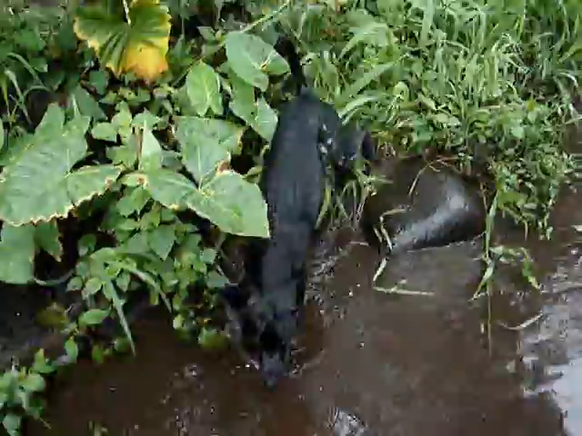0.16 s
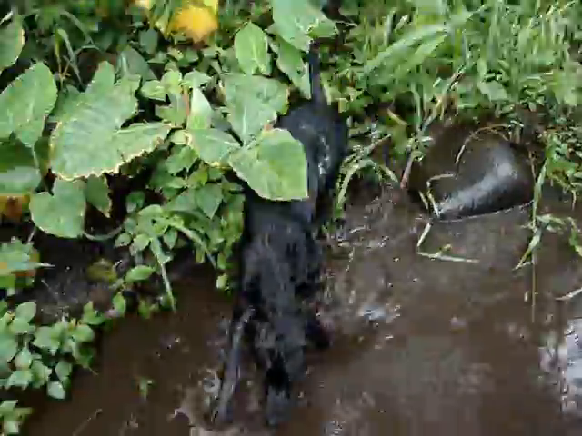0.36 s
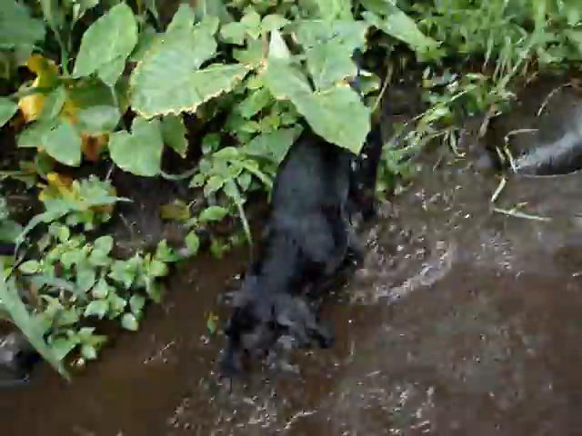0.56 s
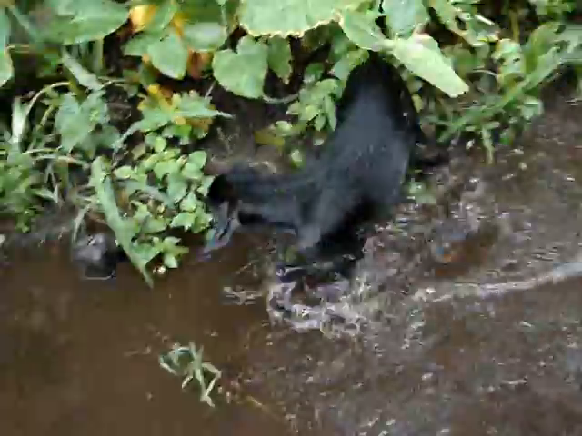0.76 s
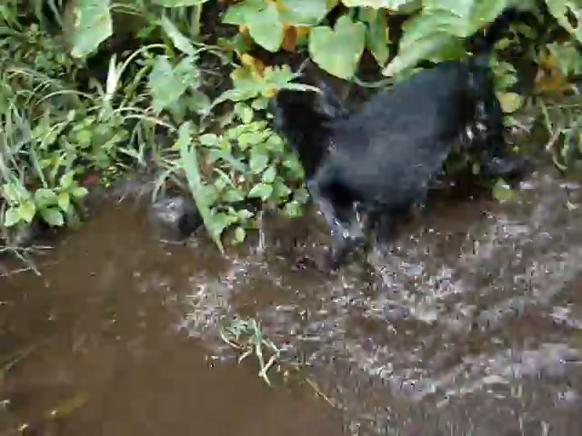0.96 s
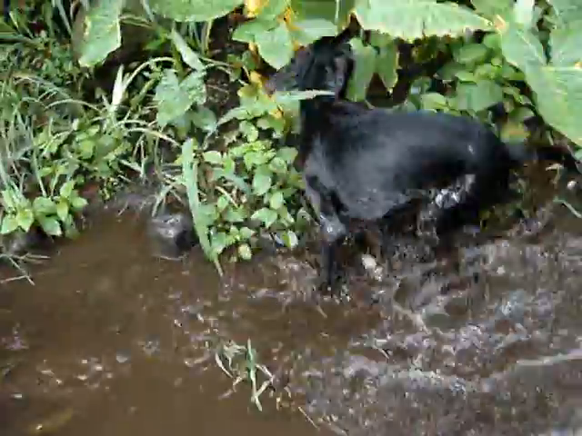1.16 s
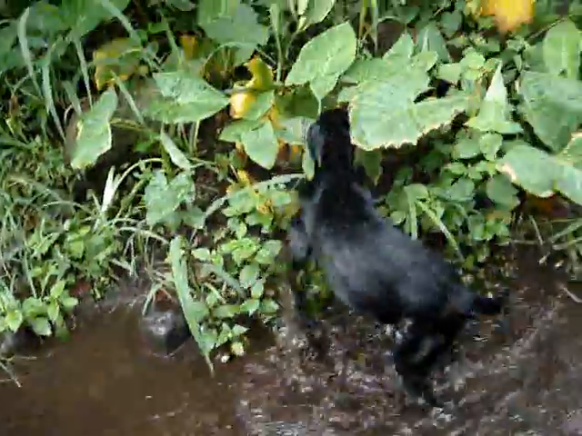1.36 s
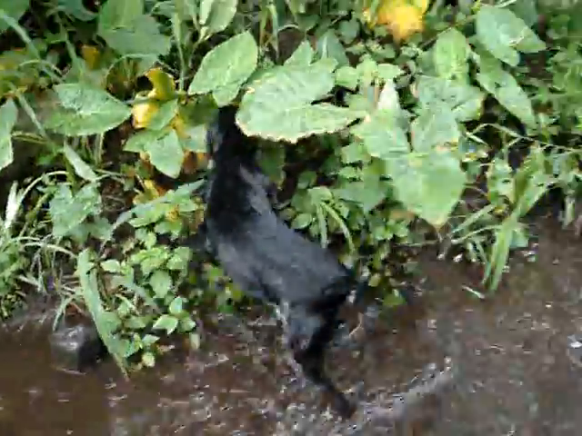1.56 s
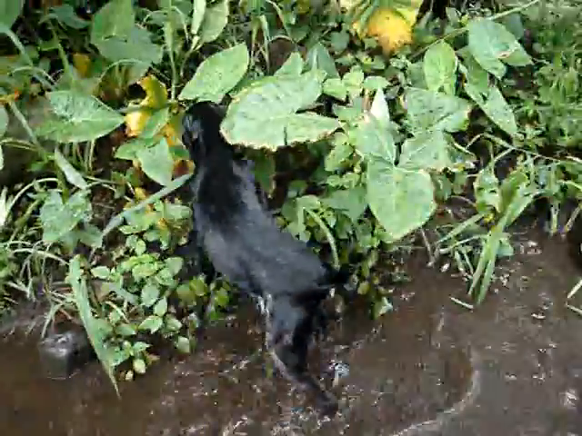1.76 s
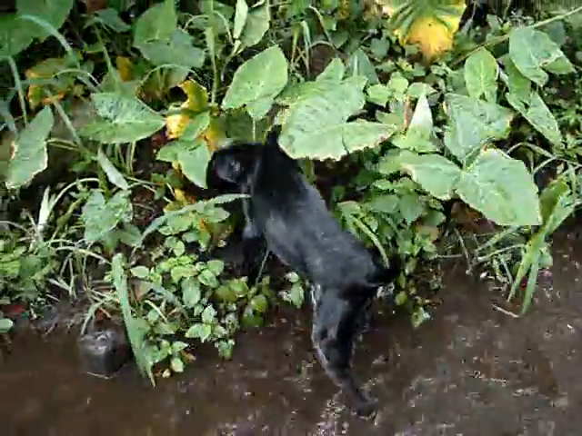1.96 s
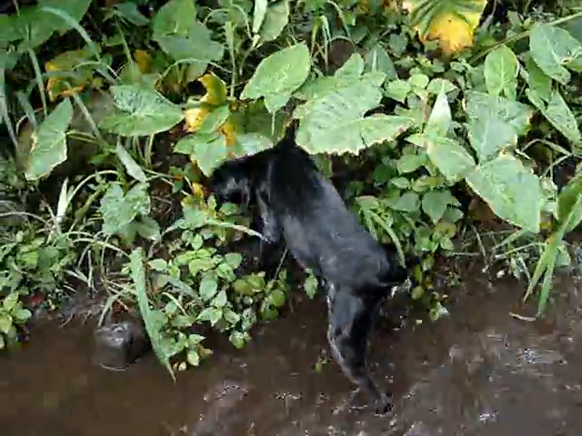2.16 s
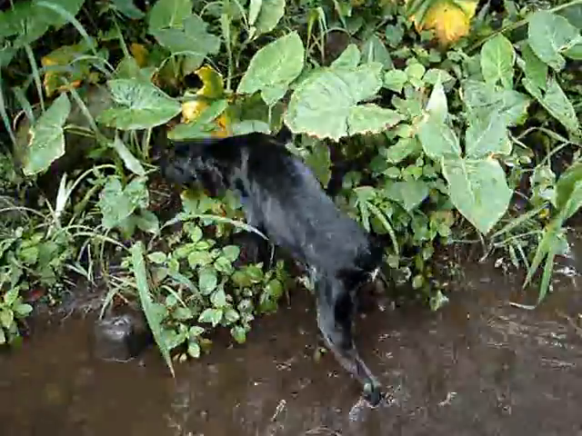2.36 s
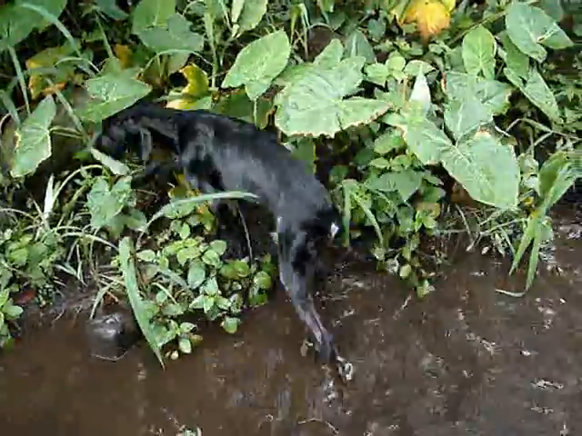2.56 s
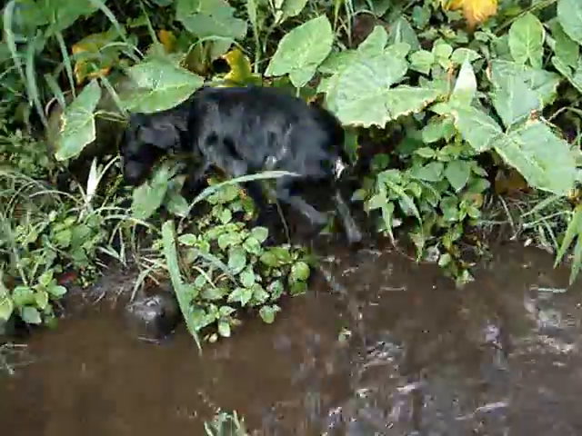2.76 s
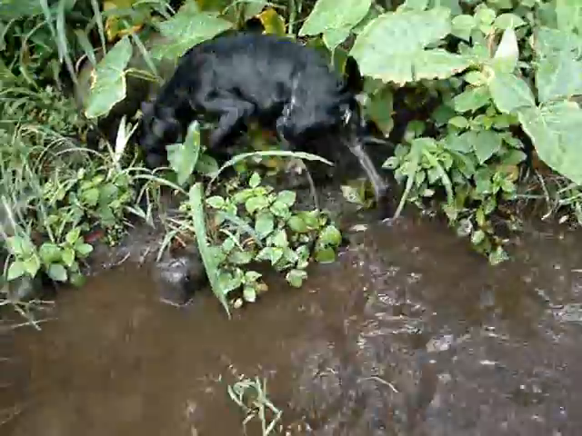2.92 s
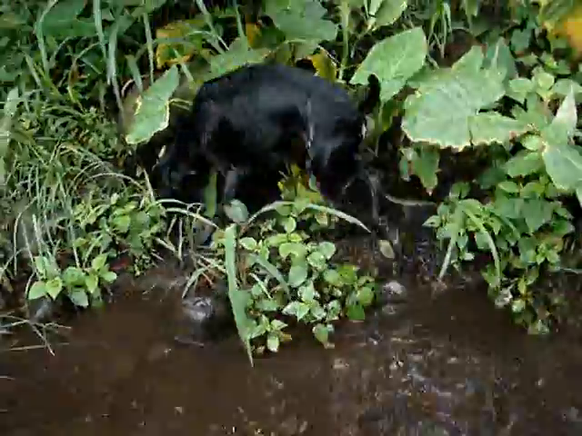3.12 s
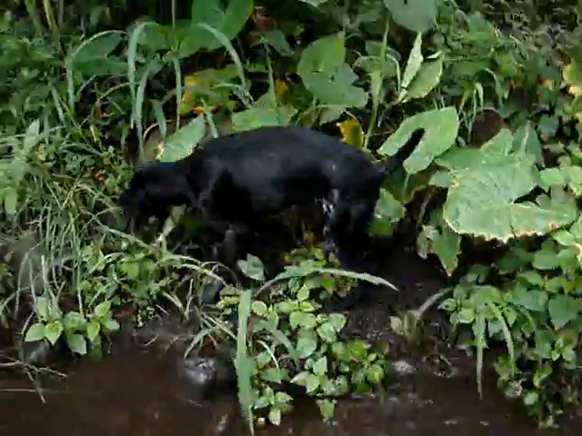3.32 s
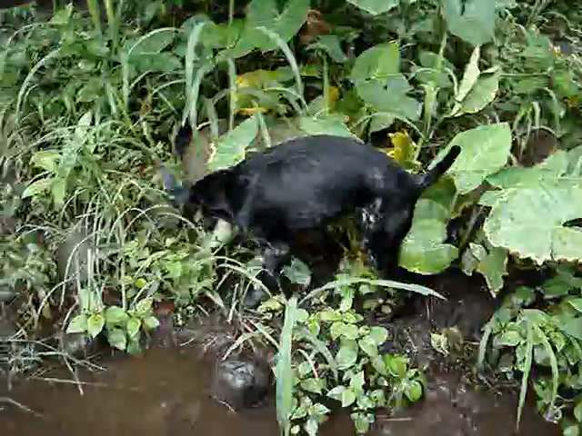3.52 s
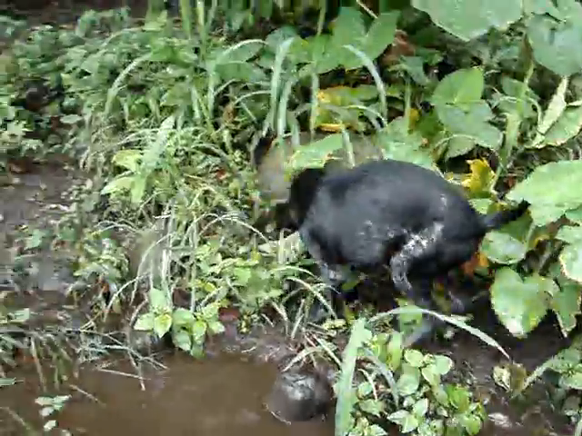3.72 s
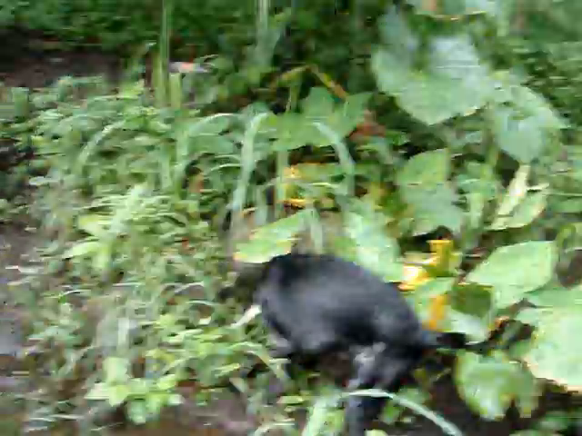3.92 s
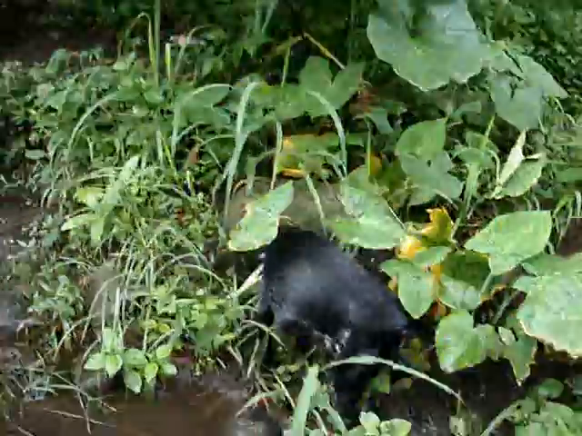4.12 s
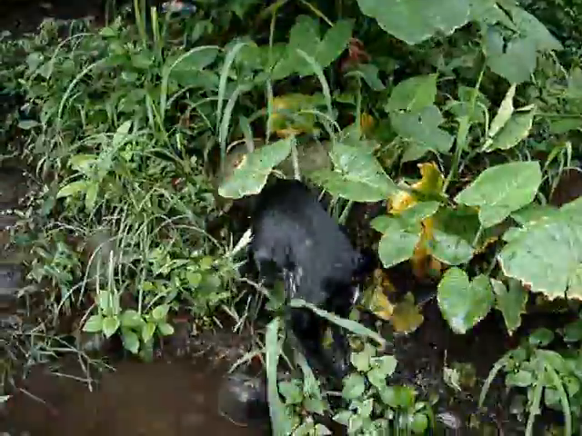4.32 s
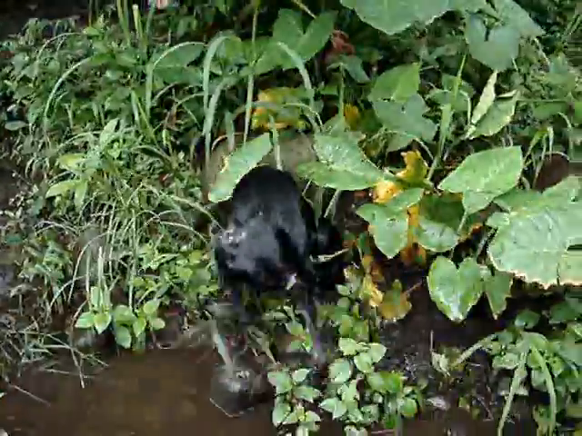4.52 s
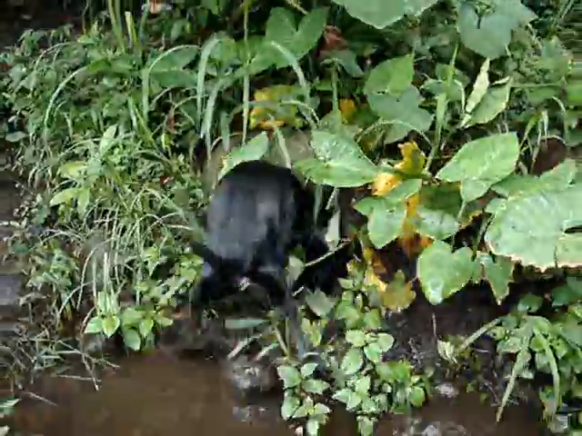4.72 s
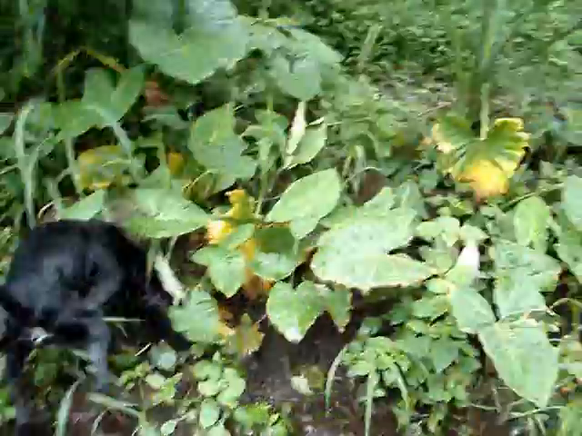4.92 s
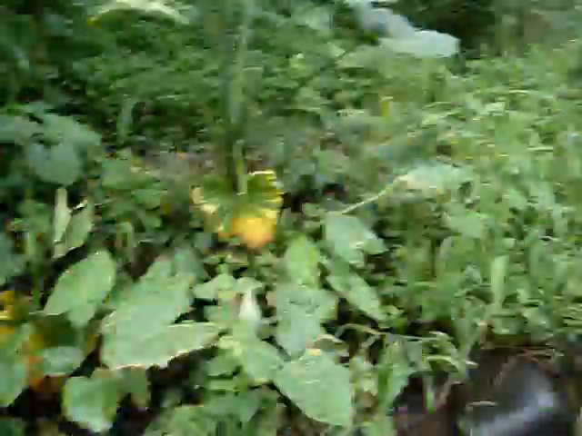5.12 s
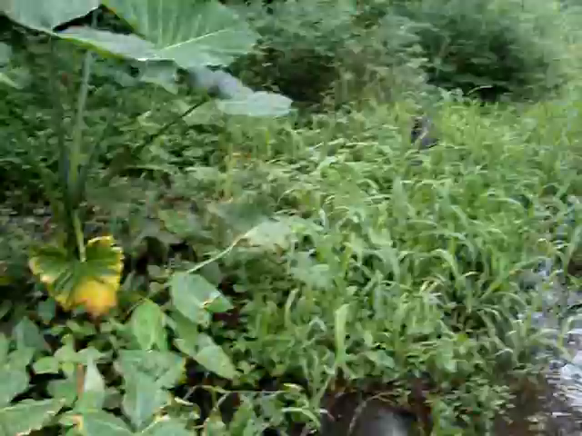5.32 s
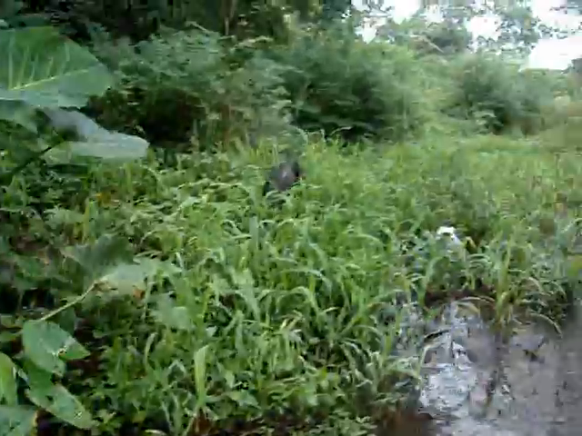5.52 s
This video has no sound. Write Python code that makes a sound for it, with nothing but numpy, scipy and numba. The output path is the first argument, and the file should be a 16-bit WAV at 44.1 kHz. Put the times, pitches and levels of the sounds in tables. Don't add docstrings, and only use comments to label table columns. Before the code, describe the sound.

Paws plop and splash in shallow running water, peaking in one big slap, followed by steady trickling, a few smaller splashes and drips.

```python
import sys
import numpy as np
from scipy import signal
from scipy.fft import rfft, irfft, next_fast_len
from scipy.io import wavfile
from scipy.ndimage import uniform_filter1d
from numba import njit

SR = 44100
rng = np.random.default_rng(int(sys.argv[2]) if len(sys.argv) > 2 else 0)


def store_wav(level_fs):
    pcm = np.round(np.clip(np.atleast_2d(level_fs), -1, 1) * 32767)
    wavfile.write(sys.argv[1], SR, pcm.T.astype(np.int16))


def gain_from_db(level_db):
    decades = np.asarray(level_db, float) / 20
    return 10 ** decades


N = 250399

# start in seconds, droplet level in dB, centre pitch in Hz,
# high spray in dB against the droplets, length in ms.
SHEETS = [(0.325, -19, 3700, -13, 16), (0.343, -16, 3040, -25, 24), (0.541, -20, 3550, -4.5, 32),
          (0.578, -14.5, 4240, -24, 11.3), (0.682, -20, 3120, -10, 14), (0.786, -17.5, 2500, -10, 15.5),
          (.975, -17, 4400, -17, 13), (1.116, -19.5, 3500, -19, 36), (1.166, -16.5, 3170, -16, 15),
          (1.231, -20, 2400, -20, 9.2), (1.274, -12.5, 2620, -12, 15.5), (1.33, -24, 3580, -16, 30),
          (1.37, -28, 3300, -14, 13), (1.405, -24, 1540, -23, 43), (1.426, -30, 3600, -15, 28),
          (1.452, -19.5, 3770, -11, 44), (1.505, -26, 3800, -7, 10), (1.625, -24, 2980, -12, 13),
          (2.519, -20, 2960, -14, 7.9), (2.72, -25, 2700, -19, 22), (3.012, -21, 1310, -12, 24),
          (3.078, -31, 2940, 1.5, 9.9), (3.194, -17, 2070, -13, 23), (3.263, -21, 3220, -20, 25),
          (3.451, -33, 1970, -18, 15), (4.021, -19.5, 3250, -16, 26)]
# start in seconds, peak in dB, pitch in Hz, ringing in cycles.
POCKETS = [(0.21, 0, 1610, 14), (0.325, -2.5, 550, 20), (0.351, 1, 1040, 13), (0.54, 3.5, 885, 12),
           (0.564, 4, 980, 4.6), (0.714, -15, 1500, 13), (0.748, -6, 1650, 7.6), (0.762, 0.5, 680, 8.5),
           (0.783, -2, 1660, 15), (0.811, -14, 1260, 12), (0.995, 6, 1080, 6.3), (1.114, -6, 1030, 10),
           (1.134, 9, 1550, 5), (1.1664, 5, 1010, 13.6), (1.031, -5, 714, 9), (1.276, 13.5, 960, 3.2),
           (1.372, -6, 1020, 13), (1.463, -3, 417, 8.2), (1.495, -8, 1520, 11), (2.727, 0.5, 1590, 12),
           (3.012, -3.5, 1600, 27), (3.07, -8, 1080, 18), (3.153, -4, 925, 18), (3.215, 3, 1440, 14),
           (3.2408, 0.5, 1630, 11), (3.337, 1, 790, 7), (3.372, -10, 595, 9), (3.43, -5, 447, 22),
           (4.419, 1, 640, 5), (5.196, -3, 630, 8.3)]
# start in seconds,
# peak in dB, pitch in Hz.
SINGLE_DROPS = [(0.3267, -14, 3920), (0.3452, -7, 3500), (0.5472, -15, 3540), (0.5827, -11, 4000),
                (0.5867, -14, 4100), (0.8248, -5, 3250), (0.8324, -19, 3120), (0.8912, -12.5, 2530),
                (0.9433, -15, 3615), (0.9813, -12, 4560), (0.9975, -5, 2780), (1.0193, -13, 4500),
                (1.1218, -16, 3280), (1.1349, -16, 3615), (1.1568, -17, 3300), (1.1733, -13, 4040),
                (1.1776, -13, 2720), (1.2053, -4, 2060), (1.2057, -2, 3300), (1.4417, -26, 1940),
                (1.2322, -4, 2340), (1.2787, -10, 4600), (1.3474, -10, 3760), (1.3759, -14, 4688),
                (1.4552, -7, 4230), (1.4647, -4.5, 3830), (1.4751, -7, 3700), (1.4786, -7, 3615),
                (1.532, -12, 3530), (1.6293, -15, 3920),
                (2.1448, -17, 2070), (2.4648, -20, 1720), (2.465, -26, 4600), (2.5206, -20.5, 4850),
              (2.5664, -25, 6300), (2.7218, -20, 3840), (2.7283, -17, 1940), (2.7381, -17.5, 3140),
              (2.9849, -15, 6750), (3.013, -14, 2090), (3.0285, -30, 6900), (3.1963, -18, 2090),
              (3.2008, -15.5, 4630), (3.2665, -17.5, 3450), (3.3726, -17, 1650), (3.0188, -26, 424),
              (3.3745, -19.5, 406), (4.0204, -21, 2020), (4.0405, -20, 2400), (4.0422, -19, 3440),
              (4.9178, -15, 3890), (2.7225, -22, 4600), (3.0819, -23, 3600), (5.2662, -15.5, 6060)]
# start in seconds,
# level in dB, pitch in Hz.
SPRAY_DROPLETS = [(0.3258, -36, 5700), (0.3304, -24, 2800), (0.3327, -27, 4260), (0.3353, -32, 5700),
                  (0.355, -23, 3360), (0.3552, -32, 4820), (0.3586, -26, 4670), (0.3608, -24, 2740),
                  (0.4136, -27, 5510), (0.5423, -25, 2650), (0.5429, -33, 6640), (0.5433, -33, 5000),
                  (0.5574, -28, 6580), (0.5605, -27, 3380), (0.5606, -24, 4040), (0.5807, -20, 5510),
                  (0.5872, -32, 5580), (0.5875, -23, 3550), (0.6184, -23, 3480), (0.6858, -21, 3630),
                  (0.6866, -28, 6830), (0.6889, -26, 4570), (0.6896, -28, 6950), (0.6921, -19, 2900),
                  (0.7058, -37, 4200), (0.7888, -31, 7000), (0.7938, -26, 5570), (0.7978, -30, 6700),
                  (0.8003, -23, 2820), (0.825, -17, 2640), (0.8262, -21, 3530), (0.937, -22, 2840),
                  (0.9554, -21, 2570), (0.9738, -18, 4760), (0.9834, -27, 6640), (0.9837, -19, 4300),
                  (0.9854, -25, 6330), (0.9888, -27, 5450), (0.9985, -18.5, 4000), (1.0095, -28, 3400),
                  (1.0194, -20, 3130), (1.0307, -24, 2760), (1.0398, -25, 2880), (1.049, -22, 4200),
                  (1.1378, -23, 4070), (1.1425, -21, 4510), (1.147, -28, 3760), (1.1565, -34, 6700),
                  (1.166, -21, 3030), (1.1778, -29, 5070), (1.1867, -27, 4320), (1.1884, -22, 2630),
                  (1.195, -31, 3230), (1.2053, -26, 5320), (1.2149, -22, 2860), (1.2308, -24, 6740),
                  (1.2313, -26, 5950), (1.2375, -19, 2300), (1.278, -21, 2690), (1.2789, -25, 3630),
                  (1.2807, -23, 6850), (1.282, -21, 4540), (1.282, -22, 4030), (1.2842, -28, 6010),
                  (1.2875, -26, 4640), (1.2905, -21, 4200), (1.2956, -26, 6080), (1.2975, -25, 2380),
                  (1.2985, -30, 4760), (1.3174, -22, 3630), (1.3388, -25, 3800), (1.3402, -27, 3260),
                  (1.358, -26, 4700), (1.3646, -25, 3340), (1.3673, -23, 4510), (1.4056, -32, 2000),
                  (1.4082, -27, 4320), (1.4297, -23, 4700), (1.432, -31, 3450), (1.4346, -24, 4200),
                  (1.4412, -25, 4380), (1.442, -23, 2700), (1.4415, -23, 3400), (1.4415, -17, 2010),
                  (1.4455, -24, 3510), (1.4525, -17, 3380), (1.4548, -36, 6950), (1.4748, -26, 6890),
                  (1.4776, -23, 4760), (1.4792, -26, 6450), (1.4792, -28, 5770), (1.485, -18, 3760),
                  (1.5087, -22, 3880), (1.5105, -26, 4700), (1.5144, -25, 3970), (1.6265, -22, 3070),
                  (2.5699, -29, 3380), (2.5703, -32, 6510), (2.7284, -30, 2840), (2.7286, -27, 3760),
                      (2.7288, -31, 4640), (2.7382, -29, 4450), (2.985, -31, 4350), (2.9868, -29, 5700),
                      (3.2005, -36, 4070), (3.2071, -27, 4070), (3.208, -23, 2380), (3.2122, -29, 4700),
                      (3.2206, -34, 4570), (3.2693, -25, 1960), (3.3661, -28, 3450), (3.3696, -27, 3380),
                      (3.3837, -26, 2180), (3.4555, -25, 2130), (3.4789, -29, 3400), (3.963, -28, 3750),
                      (4.8646, -32, 5700), (4.99, -30, 3050), (4.043, -25, 1890),
                  (0.223, -27, 5100), (0.3258, -36, 5700), (0.5433, -30, 5000), (0.5528, -33, 6330),
              (0.5872, -29, 5580), (0.6886, -32, 4600), (0.6926, -34, 7580), (0.7058, -38, 4200),
              (0.7885, -32, 6900), (0.994, -28, 5200), (1.0095, -27, 3400), (1.0376, -25, 4320),
              (1.0604, -25, 3450), (1.1155, -30, 5170), (1.1218, -25, 4130), (1.1244, -29, 2430),
              (1.167, -34, 6640), (1.1735, -27, 1820), (1.1755, -30, 6640), (1.1833, -35, 5260),
              (1.1888, -34, 5200), (1.2053, -29, 5390), (1.2056, -27, 7700), (1.2515, -28, 3800),
              (1.2694, -23, 4760), (1.2808, -24, 7600), (1.282, -27, 4510), (1.2882, -31, 6260),
              (1.2985, -31, 4760), (1.298, -23, 3900), (1.3026, -35, 6260), (1.3395, -30, 5070),
              (1.3623, -27, 4320), (1.3756, -21, 3450), (1.3788, -25, 4600), (1.4053, -28, 2010),
              (1.4112, -29, 4260), (1.418, -29, 3260), (1.4688, -32, 7270), (1.4747, -32, 5830),
              (1.4805, -26, 7200), (1.4876, -26, 4890), (1.5071, -28, 5760), (3.2143, -34, 7200)]
# start in seconds, level in
# dB, pitch in Hz.
SMALL_BUBBLES = [(0.2075, -18.5, 1220), (0.3339, -18, 1540), (0.3413, -32, 594), (0.3536, -15, 1360),
                 (0.3639, -26.5, 468), (0.3713, -20, 1550), (0.4012, -23, 1470), (0.4375, -18, 1620),
                 (0.5435, -18, 1610), (0.6894, -20, 1600), (0.7142, -18, 1470), (0.7556, -20, 1680),
                 (0.7742, -19, 1590), (0.807, -20, 1040), (0.829, -15, 1570), (0.9951, -21, 656),
                 (1.0987, -21, 990), (1.115, -22, 1000), (1.1179, -24, 737), (1.1265, -24, 720),
                 (1.1313, -20, 1070), (1.1545, -17, 1580), (1.2046, -24, 1800), (1.2063, -23, 1160),
                 (1.2756, -21, 629), (1.2766, -27, 1420), (1.299, -24, 1440), (1.3148, -21, 720),
                 (1.3715, -18, 1490), (1.3742, -21, 1740), (1.3998, -21, 1210), (1.4077, -17, 1510),
                 (1.426, -15, 1240), (1.4315, -16, 1620), (1.438, -19.5, 1025), (1.4465, -23, 1210),
                 (1.454, -17, 1050), (1.465, -21, 850), (1.4937, -22, 1470),
                 (2.98, -24, 1090), (2.9997, -23, 715), (3.0155, -20, 995), (3.027, -30, 1030),
                     (3.041, -21, 1410), (3.0774, -21, 1290), (3.083, -19, 1550), (3.1019, -37, 710),
                     (3.1236, -25, 840), (3.14, -22, 860), (3.164, -20, 1350), (3.1808, -24, 770),
                     (3.1935, -21, 1480), (3.2003, -22, 517), (3.2334, -23, 1240), (3.237, -20, 1000),
                     (3.2548, -21, 1600), (3.3034, -26, 880), (3.3458, -28, 870), (3.3507, -33, 595),
                     (3.384, -28, 1205), (3.3865, -24, 730), (3.403, -21, 1700), (3.42, -22, 716),
                     (3.438, -21, 835), (3.4586, -17, 1590), (3.4636, -21, 518), (3.4672, -20, 1570),
                     (3.4853, -27, 1380), (3.494, -33, 1020),
                 (0.2951, -21, 1010), (0.3119, -24, 1260), (0.3574, -20, 1720), (0.5173, -28, 1950),
                (0.5761, -26, 770), (0.7867, -22, 1090), (0.8068, -28, 2170), (0.8121, -15, 1320),
                (0.8788, -25, 1800), (0.934, -26, 1100), (1.0284, -28.5, 534), (1.0555, -24, 1410),
                (1.069, -24, 860), (1.0856, -23, 695), (1.1135, -28, 2120), (1.1398, -22, 773),
                (1.1484, -26, 2020), (1.1904, -17, 1620), (1.2762, -20, 1440), (1.3175, -28, 915),
                (1.3574, -21, 1520), (1.3729, -28, 1980), (1.4074, -22, 1570), (1.4644, -19, 826),
                (1.4761, -27, 1690), (1.4933, -12.5, 1490), (1.5944, -26, 510), (1.8613, -22, 1530),
                (1.8631, -28, 770), (1.9373, -23, 900), (1.9862, -23, 980), (2.1921, -27, 540),
                (2.3615, -21, 1640), (2.5458, -26, 890), (2.6937, -24, 785), (2.7186, -23, 2040),
                (2.7543, -22, 1580), (3.1619, -26, 875), (3.1962, -19, 1990), (3.6342, -22.5, 592),
                (3.7547, -27, 549), (5.1204, -28, 1800), (5.1225, -21.5, 910)]
# start in seconds, end in seconds, level in dB.
PAW_DRAG = (3.368, 3.46, -28.5)
# centre in seconds, peak in dB, half width in ms.
SLAP = (1.234, -35, 2.0)
# time in seconds, gurgle level in dB, stirring in dB above it.
FLOW_LEVELS = [(0.1, -29, 4), (0.75, -28.5, 3), (1.1, -29, 4.5), (1.3, -27.5, 1.5), (1.45, -28, 4.5),
               (1.57, -28.5, 0.5), (1.8, -29.5, 0.5), (2.2, -29.5, -1.5), (2.702, -29, 0.5),
               (2.9, -29.5, 1), (3.2, -27.5, -1), (3.3, -28.5, 0), (3.43, -26.5, 0.5), (3.55, -29, -1),
               (4.2, -31, 0.5), (4.75, -31.5, 1.5), (5.2, -29, 0.5), (5.55, -30.5, 1.5)]
# frequency in Hz, level in dB per Hz.
GURGLE_TONE = [(18, -59.5), (30, -43), (59, -36), (109, -35), (231, -12), (583, -5), (749, -6), (891, -4.5),
               (1210, -9.5), (3000, -16), (3900, -24.5), (6600, -120)]
# frequency in Hz, level in dB per Hz.
FIZZ_TONE = [(710, -78), (1200, -6), (2120, -5), (2360, -12), (2640, -9.5), (3840, -6.5), (8450, -18.5),
             (10000, -27.5), (13000, -66), (22000, -120)]
# frequency in Hz, level in dB per Hz.
RUMBLE_TONE = [(15, -56), (25, -11.5), (114, -4.5), (167, 2), (200, 4.5), (260, -42), (440, -120)]

CAMERA_RATE = 32000


def unit(x):
    return x / np.sqrt(np.mean(x ** 2))


def curve(s, values):
    return np.interp(np.arange(N) / SR, s, values)


def colour(x, tone):
    size = next_fast_len(N)
    hz = np.arange(size // 2 + 1) * SR / size
    tone_hz, tone_db = np.transpose(tone)
    gain_db = np.interp(np.log(hz + 1), np.log(tone_hz), tone_db)
    return unit(irfft(rfft(x, size) * gain_from_db(gain_db), size)[:N])


@njit
def ring(count, start, turn, cycles, size, glide, swell):
    out = np.zeros(count)
    for k in range(len(start)):
        steps = int(2 * cycles[k] * 2 * np.pi / turn[k]) + 2
        fade = np.exp(-6. / steps)
        phase, step, gain = 0., turn[k], size[k]
        for i in range(int(start[k]), min(int(start[k]) + steps, count)):
            out[i] += gain * np.sin(phase) * min(phase / swell, 1.)
            phase += step
            step *= 1 + glide / steps
            gain *= fade
    return out


def bubbles(s, hz, cycles, size, glide=0.3, swell=5.):
    turn = 2 * np.pi * np.clip(hz, 20, .3 * SR) / SR
    start = np.clip(s * SR, 0, N - 1)
    return ring(N, start, turn, cycles + 0 * turn, size + 0 * turn, glide, 1. * swell)


def swarm(lo_hz, hi_hz, cycles, scatter_db, count):
    when, pitch, loud = rng.random((count, 3)).T
    hz = lo_hz + (hi_hz - lo_hz) * pitch
    large = np.minimum(-np.log(1 - loud), 4)
    return unit(bubbles(when * N / SR, hz, cycles, np.sqrt(hz) * gain_from_db(scatter_db * large)))


def splashes(count=40):
    s, drop_db, hz, spray_db, length_ms = np.transpose(SHEETS)[:, :, None]
    late, pitch, loud, fine = rng.random((4, len(SHEETS), count))
    when = (s + late * np.clip(length_ms, 1, 45) / 1000).ravel()
    size = gain_from_db(np.minimum(drop_db, -13) - 5 * late ** 2 - 8 * loud)
    drop_hz = hz * 2 ** (1.5 * pitch - .75)
    spray_hz = 4800 + 4200 * fine
    drops = bubbles(when, drop_hz.ravel(), 6, size.ravel())
    spray = bubbles(when, spray_hz.ravel(), 19.0, (size * gain_from_db(spray_db)).ravel())
    return gain_from_db(-1.5) * (drops + spray)


def plops():
    s, peak_db, hz, cycles = np.transpose(POCKETS)
    return bubbles(s - .0004, 0.995 * hz, np.clip(cycles, 2, 25), gain_from_db(peak_db - 13.5), glide=0.029, swell=13.4)


def single_drops():
    s, peak_db, hz = np.array(SINGLE_DROPS).T
    cycles = 10.7 - 0.68 * (peak_db + 11.0)
    level_db = np.minimum(peak_db, -1)
    ticks = bubbles(s - .0003, 1.12 * hz, 1.0, gain_from_db(1.8 * level_db + 8.5))
    return ticks + bubbles(s, 0.994 * hz, 1.1 * cycles, gain_from_db(level_db + 1.5), glide=0.12)


def crackle():
    s, db, hz = np.array(SPRAY_DROPLETS).T
    cycles = 8.8 + 3.05 * hz / 1000
    spray = bubbles(s, 0.98 * hz, cycles, gain_from_db(db + 6), glide=0.09, swell=11.4)
    s, db, hz = np.array(SMALL_BUBBLES).T
    churn = bubbles(s - .0004, 0.97 * hz, 19.7, gain_from_db(db + 1.5), glide=0.16, swell=18.0)
    return spray + churn


def slosh():
    churn = swarm(430, 950, 14, 2, count=1800)
    start, end, peak_db = PAW_DRAG
    t = np.arange(N) / SR
    fade_db = 1500 * np.maximum(start - t, 0) + 492 * np.maximum(t - end, 0)
    return churn * gain_from_db(peak_db - fade_db)


def slap():
    s, peak_db, width_ms = SLAP
    return gain_from_db(peak_db) * np.exp(-((np.arange(N) / SR - s) * 1000 / width_ms) ** 2)


def wake():
    s, drop_db = np.transpose(SHEETS)[:2, :, None]
    t = np.arange(0, N / SR, .002)
    since = t - s
    left = np.sum(gain_from_db(drop_db + 13) * np.exp(-np.abs(since) / 0.044) * (since > 0), axis=0)
    return curve(t, np.minimum(left, 1.5))


def flow_surge(rate=18):
    k = int(SR / rate)
    steps = np.repeat(rng.standard_normal(N // k + 1), k)
    return .3 * unit(uniform_filter1d(uniform_filter1d(steps, k), k)[:N])


def stream():
    s, flow_db, stirring_db = np.transpose(FLOW_LEVELS)
    gurgle = swarm(150, 3200, 6, 1.0, count=18000) + 1.4 * rng.standard_normal(N)
    fizz = swarm(1200, 11000, 8, 1.7, count=24000) + 1.2 * rng.standard_normal(N)
    surge_db, stirred = flow_surge(), wake()
    gurgle_db = curve(s, flow_db) - stirred + 0.4
    fizz_db = curve(s, flow_db + stirring_db) - 6 + 5.5 * stirred
    low = colour(gurgle, GURGLE_TONE) * gain_from_db(gurgle_db + surge_db)
    high = colour(fizz, FIZZ_TONE) * gain_from_db(fizz_db + surge_db)
    spatter_db = fizz_db - 12.5 + 2.2 * (fizz_db + 31.5)
    return low + high + swarm(1200, 4800, 11, 2.0, count=2200) * gain_from_db(spatter_db)


def rumble():
    return colour(rng.standard_normal(N), RUMBLE_TONE) * gain_from_db(-56)


def scene():
    water = splashes() + plops() + single_drops() + crackle() + slosh() + stream()
    no_bass = signal.butter(4, 220, "high", fs=SR, output="sos")
    return (signal.sosfilt(no_bass, water) + slap() + rumble())[None]


def treble_dropouts(x, count=9):
    hz, _, spec = signal.stft(x, CAMERA_RATE, nperseg=256)
    power = uniform_filter1d(np.abs(spec) ** 2, size=9, axis=0)
    power = uniform_filter1d(power, size=2, axis=1)
    band = np.minimum(np.arange(len(hz)) // 4 * 4 + 2, len(hz) - 1)
    power = power[band]
    frame = (np.arange(spec.shape[1]) + 3) // count
    frame_starts = np.unique(frame, return_index=True)[1]
    peak = np.maximum.reduceat(power, frame_starts, axis=1)[:, frame]
    margin_db = np.interp(hz, [2500, 3400, 5000, 9000], [-16, -12, -8, -7.5])[:, None]
    weak = (power < peak * gain_from_db(2 * margin_db)) & (hz[:, None] > 2500)
    return signal.istft(spec * np.where(weak, gain_from_db(-17), 1), CAMERA_RATE, nperseg=256)[1]


def band_limit(x):
    return signal.sosfilt(signal.butter(12, 15770, fs=SR, output="sos"), x)


def record(dry):
    heard = treble_dropouts(signal.resample_poly(dry[0], 320, 441))
    held = heard[np.minimum(np.arange(N) * CAMERA_RATE // SR, len(heard) - 1)]
    start_s, fade_s = .0935, .006
    gate = np.clip((np.arange(N) / SR - start_s) / fade_s + 1, 0, 1) ** 7
    top_cut = signal.ellip(10, .3, 60, 15850, fs=SR, output="sos")
    mix = signal.sosfilt(top_cut, held * gate)[None]
    return band_limit(mix)


dry = scene()
out = record(dry)
store_wav(out)
```